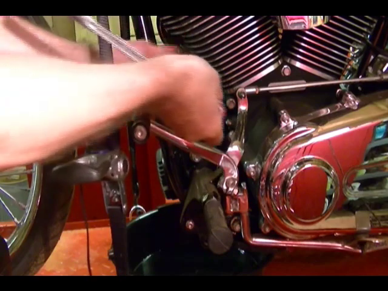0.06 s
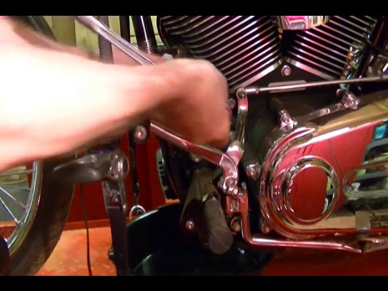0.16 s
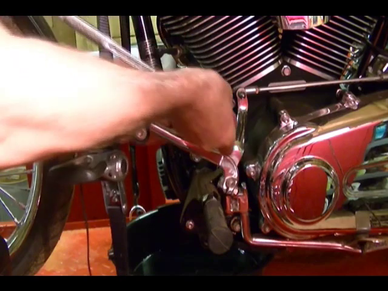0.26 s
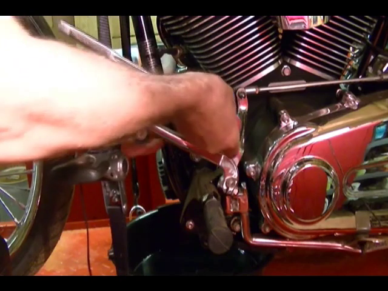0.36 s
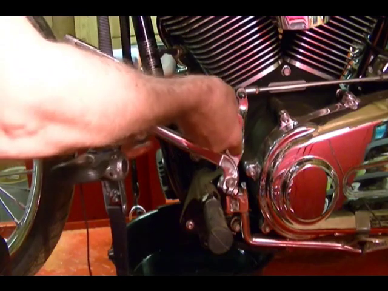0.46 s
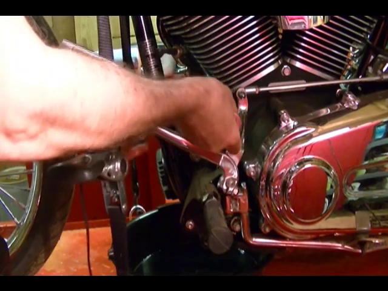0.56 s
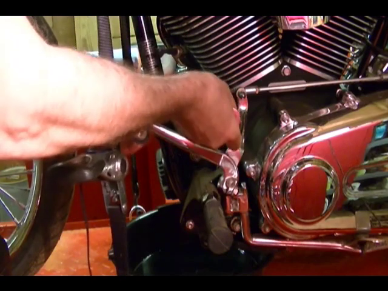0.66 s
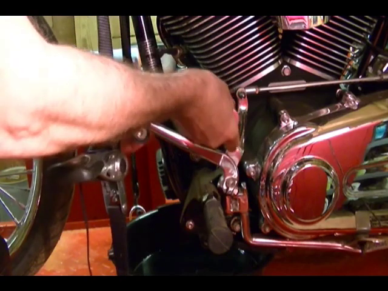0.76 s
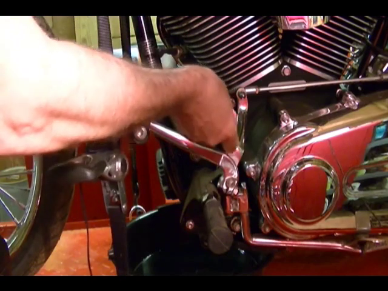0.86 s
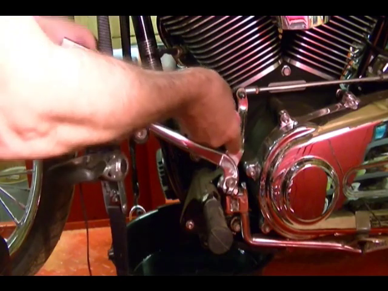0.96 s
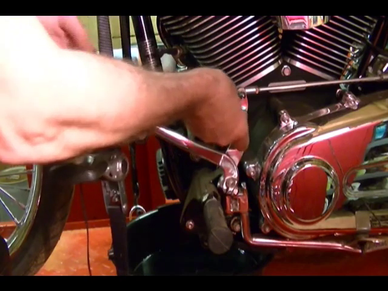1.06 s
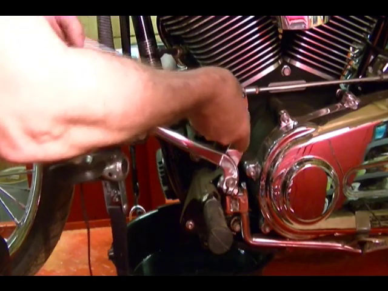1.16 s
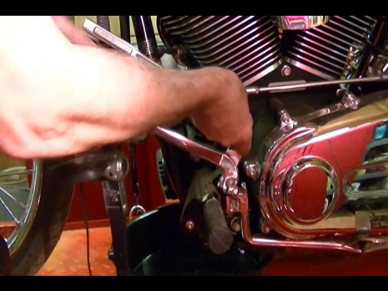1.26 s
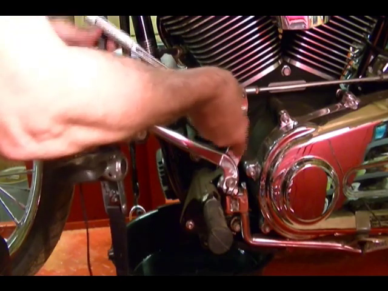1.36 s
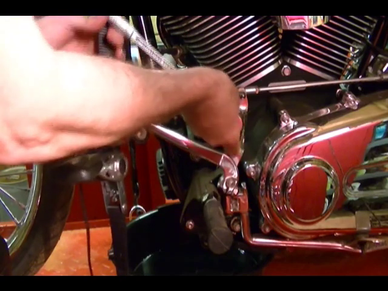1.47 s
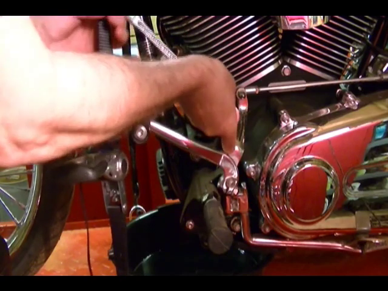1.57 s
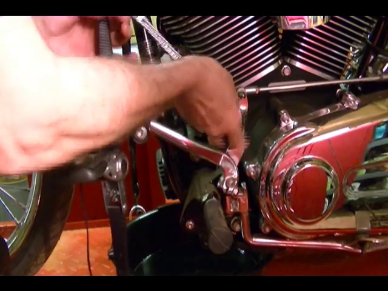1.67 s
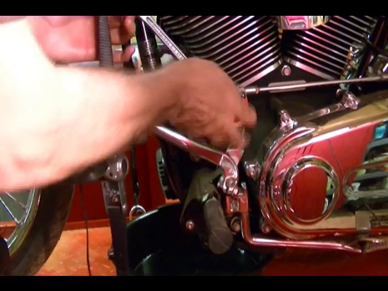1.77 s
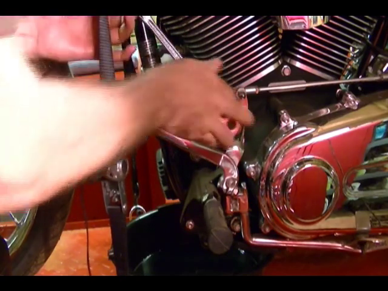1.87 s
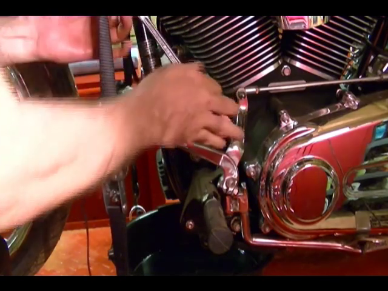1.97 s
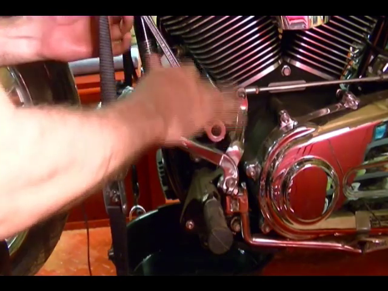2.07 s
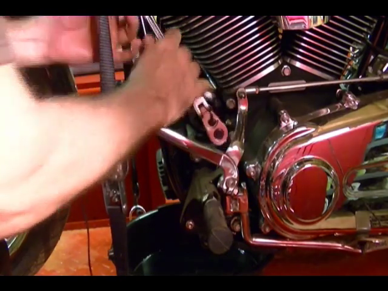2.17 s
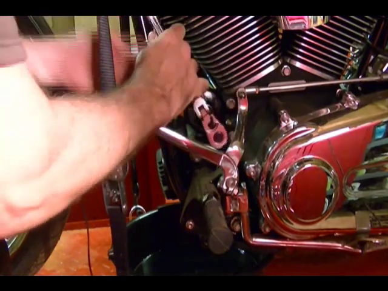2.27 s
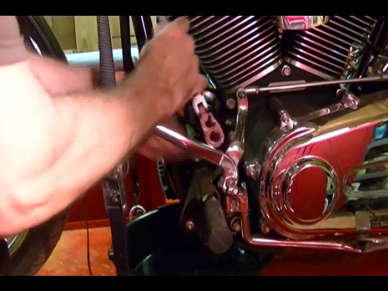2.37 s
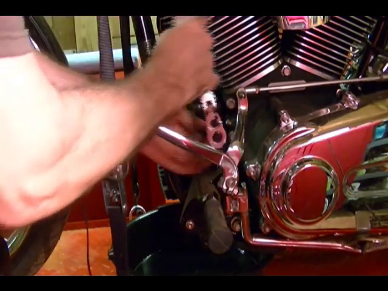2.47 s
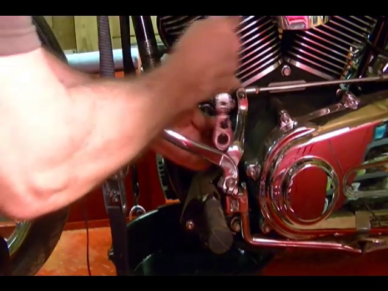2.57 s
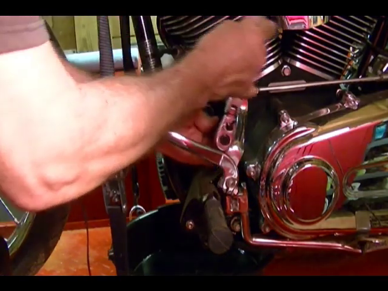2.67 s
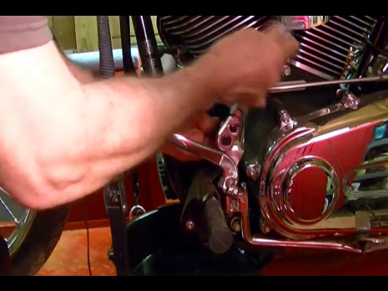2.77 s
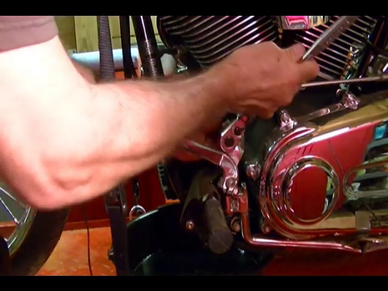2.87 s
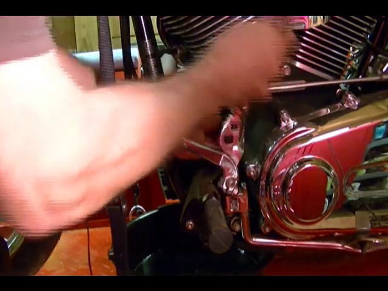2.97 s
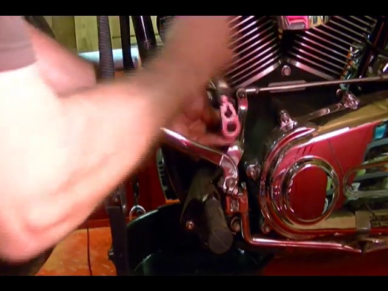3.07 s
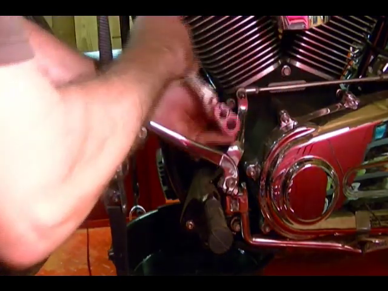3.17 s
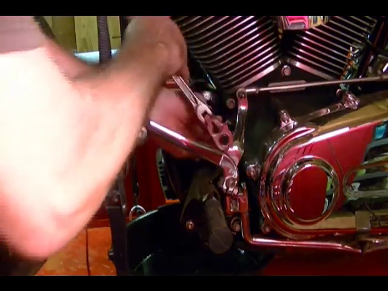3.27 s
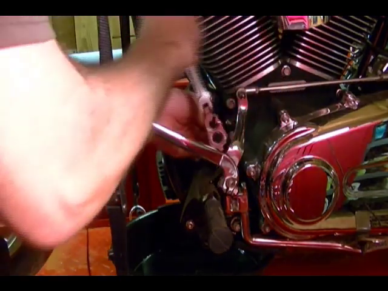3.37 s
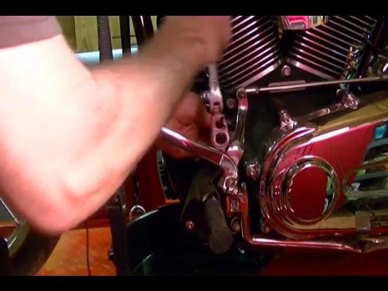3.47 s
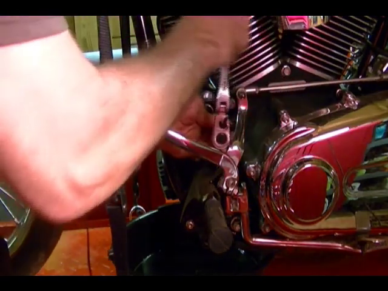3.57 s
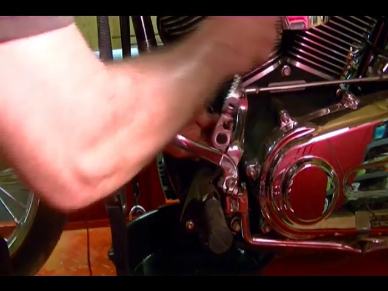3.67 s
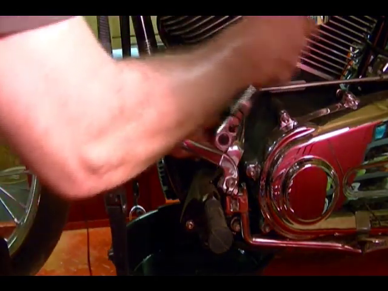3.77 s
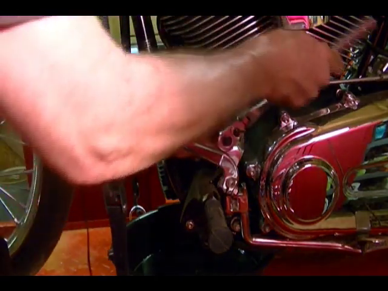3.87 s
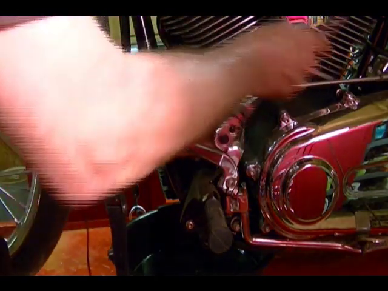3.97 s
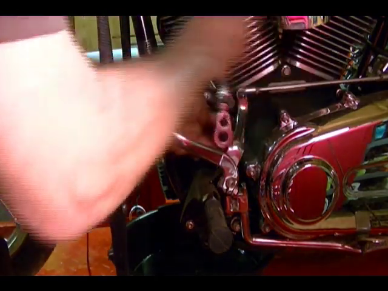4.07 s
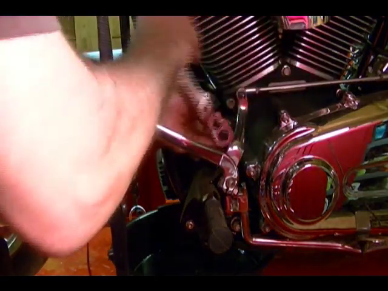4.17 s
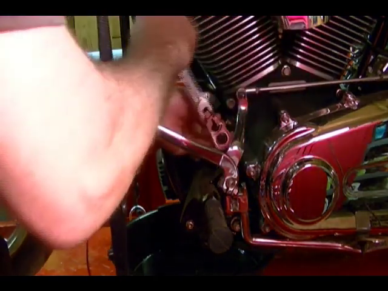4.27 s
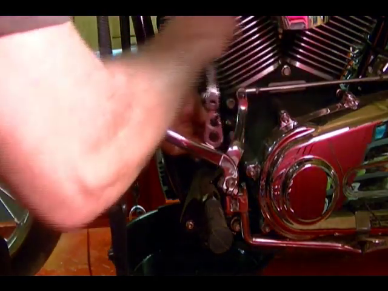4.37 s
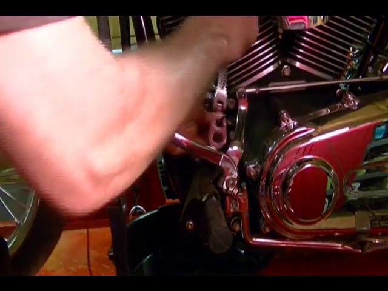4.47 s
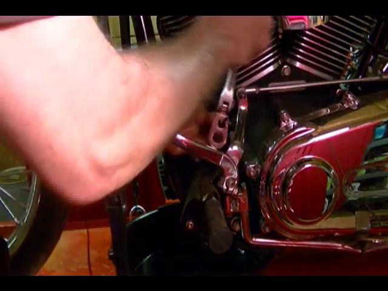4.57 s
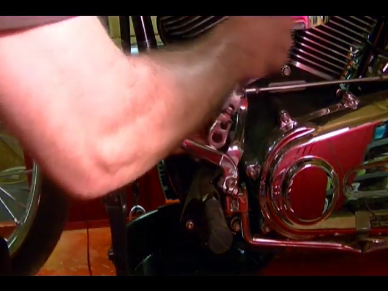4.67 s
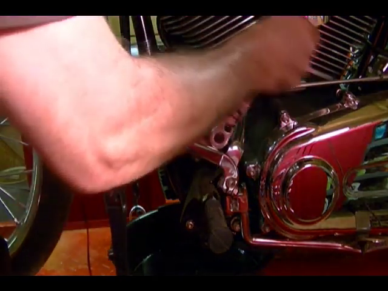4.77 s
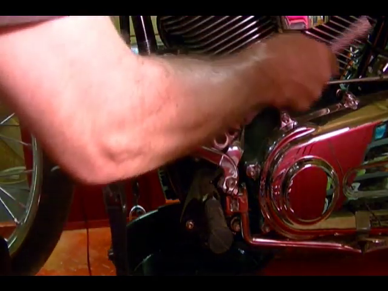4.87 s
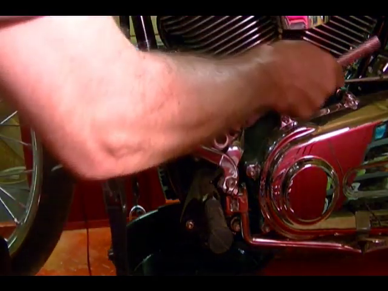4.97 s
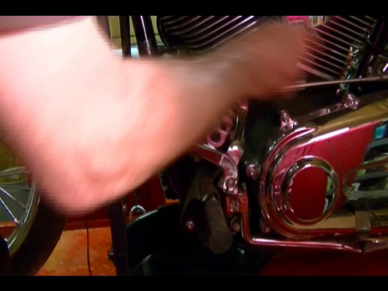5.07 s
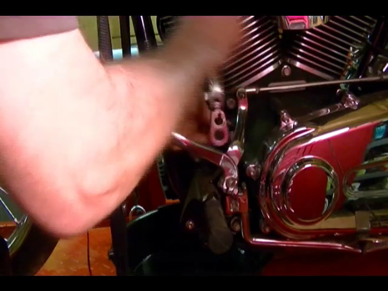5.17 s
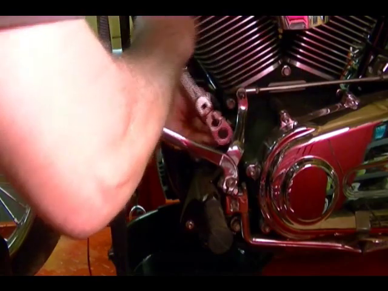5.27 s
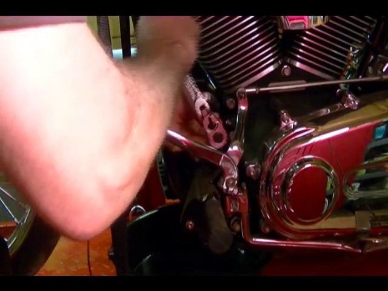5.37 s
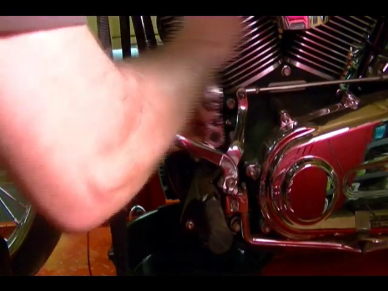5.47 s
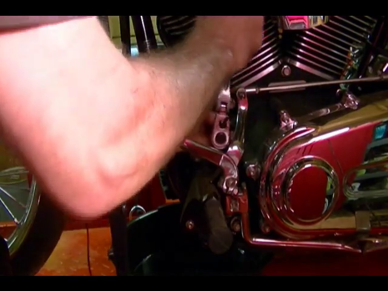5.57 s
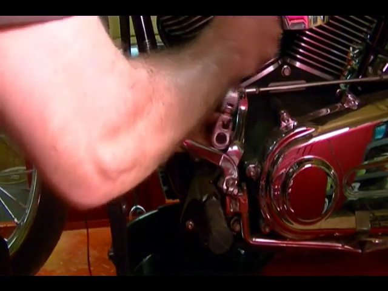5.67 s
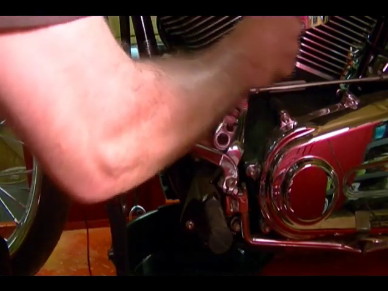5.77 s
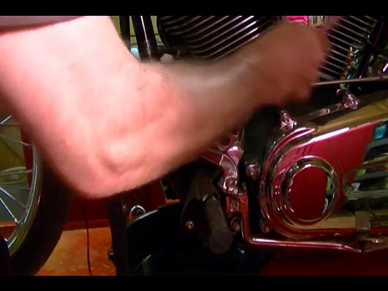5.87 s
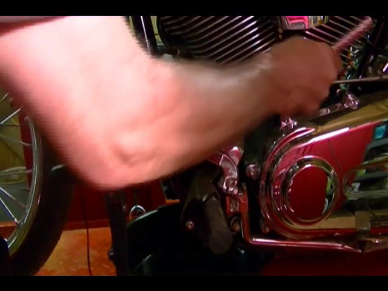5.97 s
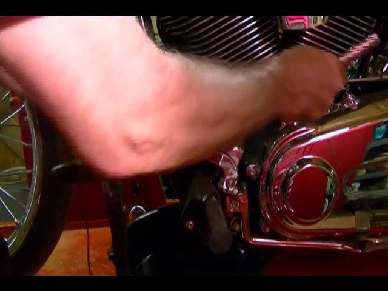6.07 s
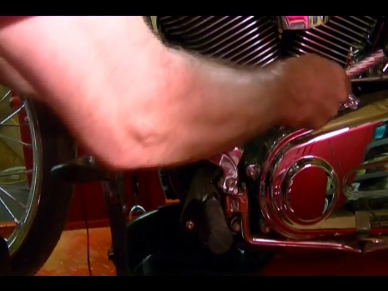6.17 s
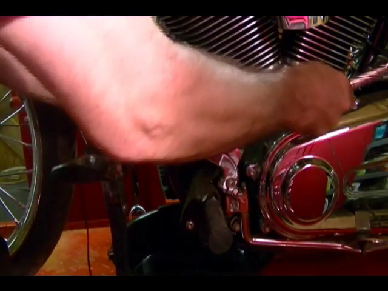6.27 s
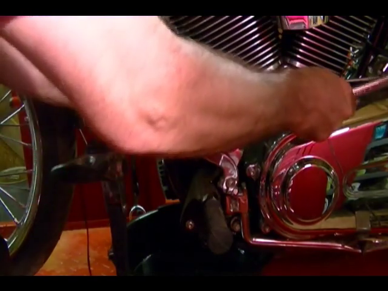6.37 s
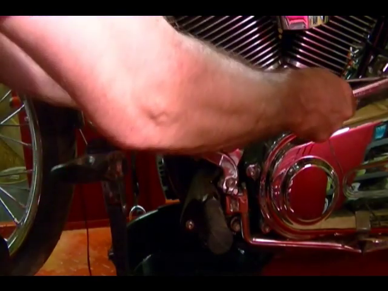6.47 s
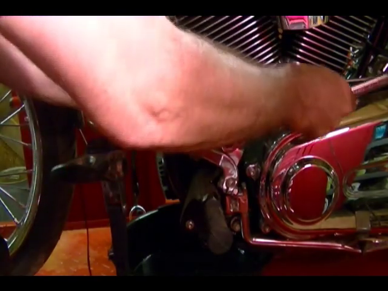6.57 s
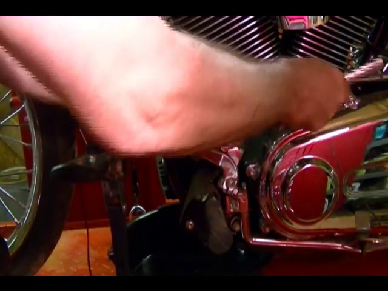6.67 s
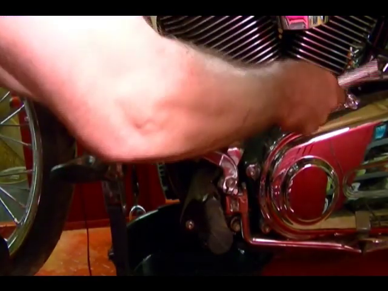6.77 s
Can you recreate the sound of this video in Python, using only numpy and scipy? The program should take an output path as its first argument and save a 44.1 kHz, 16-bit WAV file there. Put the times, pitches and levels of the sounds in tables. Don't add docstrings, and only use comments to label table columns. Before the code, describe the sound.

Close up in a small hard-walled garage, a steel bar clatters against an engine and rings brightly until a hand catches it. Dull knocks, skin rubs and small metal scuffs follow as the tool is seated. Then a ratchet clicks rapidly on three back swings, each followed by a sharp clank with a dull thump. Quiet shuffling ends it over steady hiss and faint hum.

```python
import sys
import numpy as np
from scipy import signal
from scipy.io import wavfile
from scipy.ndimage import uniform_filter1d

SR = 44100
rng = np.random.default_rng(int(sys.argv[2]) if len(sys.argv) > 2 else 0)


def gain_from_decibels(decibels):
    exponent = np.asarray(decibels, float) / 20
    return 10 ** exponent


def dump(signal):
    limited = np.clip(np.atleast_2d(signal).T, -1, 1)
    pcm = np.round(limited * 32767).astype(np.int16)
    wavfile.write(sys.argv[1], SR, pcm)


N = 300188

# (time [s], peak level [dB])
SLAMS = [
    (3.2389, -7),
    (4.2076, -7),
    (5.336, -8.5),
]
# (time [s], peak level [dB], strongest ring [Hz], treble level [dB], ring level [dB])
PAWL_CLICKS = [(3.047, -34, 5200, -22, -21), (3.07, -26.5, 4600, -9, -10), (3.096, -25, 4730, -4, -10),
               (3.1236, -23, 4870, 5, 3), (3.1533, -20.5, 5020, -2, 6), (3.178, -25.5, 5020, -3, -6),
               (4.0894, -19.5, 7200, 9, -9.5), (4.11, -22, 8000, 4, -7), (4.132, -23, 4600, -8, -12),
               (4.152, -24, 5200, 0.5, -14), (4.162, -24, 5260, 13, -10.5), (5.128, -37, 4600, -17, -7),
               (5.1429, -21, 4470, -9, -12), (5.1658, -23, 4600, 18, -7), (5.186, -23.5, 5500, 17, -8),
               (5.1967, -26, 5530, -2, -28), (5.207, -29.5, 5600, -9, -18)]
# (frequency [Hz], level [dB], t60 [s])
CAN_MODES = [(440, -31.5, 0.48), (712, -4, 0.056), (1060, 9, 0.016), (1210, 3, 0.054), (1680, 9.5, 0.021),
             (1830, 3.5, 0.045), (2135, 4, 0.033), (2730, -31, 0.055)]


def evened(x):
    return x / np.sqrt(np.mean(x ** 2) + 1e-20)


def read(points, hz):
    f, value = np.transpose(points)
    return np.interp(np.log(hz + 1), np.log(f + 1), value)


def add(mix, s, sound):
    part = mix[..., round(s * SR):][..., :sound.shape[-1]]
    part += sound[..., :part.shape[-1]]


def cut(x, hz, kind):
    return signal.sosfilt(signal.butter(2, hz, kind, fs=SR, output="sos"), x)


def band(x, lo_hz, hi_hz):
    return evened(cut(x, [lo_hz, hi_hz], "bandpass"))


def ring(modes, seconds, scatter_db=0., detune=0.):
    hz, db, t60 = np.transpose(modes)[:, :, None]
    chance = rng.standard_normal((2, len(modes), 1))
    t = np.arange(round(seconds * SR)) / SR
    phase = 2 * np.pi * hz * (1 + detune * chance[1]) * t
    decay_db = -60 * t / np.clip(t60, .001, 3)
    return (gain_from_decibels(db + scatter_db * chance[0] + decay_db) * np.cos(phase)).sum(0)


def strike(db, body, contact_ms, rise_ms, hz, ring_db, ring_ms):
    n, wall_blur_ms = 4000, 1.0
    ms = 1000 * np.arange(n) / SR
    chatter = rng.standard_normal(n) * gain_from_decibels(1.0 * rng.standard_normal(n))
    pressure = (1 - np.exp(-ms / max(rise_ms, .01))) * np.exp(-ms / max(contact_ms, .05))
    wash = signal.fftconvolve(chatter * pressure, body)[:n]
    swell = ms / max(ring_ms, .1)
    tone = swell * np.exp(1 - swell) * np.sin(2 * np.pi * hz * ms / 1000)
    blurred = np.pad(body, (0, n - len(body))) * np.exp(-ms / wall_blur_ms)
    spread = blurred * np.linalg.norm(wash) / np.linalg.norm(blurred)
    tone_db = ring_db + np.array([[0], [-15]])
    sound = np.array([wash, spread]) / abs(wash).max() + gain_from_decibels(tone_db) * tone
    return gain_from_decibels(db) * sound / abs(sound[0]).max()


def shiver(n, span):
    drift = uniform_filter1d(rng.standard_normal(n), size=span)
    return .75 + .5 * evened(uniform_filter1d(drift, size=span))


def swelling(db, length_s):
    return gain_from_decibels(db) * np.hanning(round(length_s * SR))


def steel(blows, modes, ring_ms):
    # (frequency [Hz], level [dB], t60 [s])
    treble_modes = [(8800, 18.5, 0.00066), (11200, 9.5, 0.0044), (12400, 1.5, 0.0033),
                    (13800, -36, 0.00144)]
    out = np.zeros((2, N))
    for s, db, hz, treble_db, contact_ms, ring_db in blows:
        body = ring(modes, .09, 0.17, 0.042)
        body = body + gain_from_decibels(treble_db + 15.0) * ring(treble_modes, .09, 2.5, .07)
        add(out, s, strike(db, body, contact_ms, 0.051, hz, ring_db, ring_ms))
    return cut(out, 1990, "highpass")


def ratchet():
    # (frequency [Hz], level [dB], t60 [s])
    head_modes = [(3650, 8.5, 0.012), (4470, 2.5, 0.028), (5020, 24.5, 0.014), (5900, 16.5, 0.013),
                  (7220, 9.5, 0.0072), (8200, 0.5, 0.014)]
    # (frequency [Hz], level [dB], t60 [s])
    drive_modes = [(2730, -31, 0.0011), (3350, 17.5, 0.0088), (3700, -16, 0.0037), (5200, -3, 0.0064),
                   (5500, -6.5, 0.011), (8060, 0, 0.0088)]
    # (time [s], peak level [dB], strongest ring [Hz], treble level [dB], contact [ms])
    clank_rows = [(0.3903, -18, 5900, -4, 4.1), (0.41, -16, 8060, -2, 5), (0.422, -20.5, 6200, 24, 17),
                  (0.431, -30, 7600, 3, 3.6), (0.4712, -10.5, 4940, -47, 3.6), (0.574, -12, 5020, -26, 11),
                  (0.582, -29, 3420, -34, 3.4), (0.804, -24, 3480, -45, 2.7), (1.3989, -19.5, 9730, 1, 5),
                  (2.2826, -23.5, 4650, -38, 5.8), (3.349, -29, 5330, -22, 2.7),
                  (4.1955, -31, 4700, -20, 7.5), (4.314, -33, 4300, -1, 3.9),
                  (5.5034, -31.5, 4500, -51, 1.9), (6.708, -36.5, 7720, 2, 4.6)]
    # (time [s], peak level [dB])
    play_rows = [
        (1.225, -49),
        (1.818, -44),
        (2.8903, -53),
        (2.9153, -50),
        (3.395, -44),
        (3.471, -38.5),
        (4.387, -40.5),
        (5.016, -51),
        (5.0495, -40),
    ]
    # time, peak dB, ring Hz, treble dB, contact ms, ring dB
    pawl = [(s, db, hz, treble_db, 3.45, ring_db) for s, db, hz, treble_db, ring_db in PAWL_CLICKS]
    clanks = [(*row, -10.5) for row in clank_rows]
    play = [(*row, 4600, -35, 4.5, -2.5) for row in play_rows]
    slams = [(s, db - 2, 4470, -12, 1.1, -5.5) for s, db in SLAMS]
    return steel(pawl + clanks + play, head_modes, 1.3) + steel(slams, drive_modes, 0.33)


def ticks():
    # (time [s], peak level [dB], centre [Hz], length [ms])
    contacts = [(0.082, -49, 3580, 1.7), (0.141, -56.5, 2200, 2.2), (0.371, -43, 3500, 1.3),
                (0.382, -43.5, 1590, 3), (0.3915, -13, 7400, 1.7), (0.4118, -24.5, 8500, 1.5),
                (0.4187, -16, 7050, 1.7), (0.4715, -1.5, 4370, 0.76), (0.4732, -15, 2030, 0.82),
                (0.514, -22, 1990, 3), (0.611, -17, 5500, 8.7), (0.8027, -18.5, 2350, 1.3),
                (1.384, -35, 1800, 1.5), (1.39, -35, 2930, 2.3), (1.4057, -26.5, 1480, 1.2),
                (2.2826, -17.5, 4230, 3.2), (2.284, -47, 1370, 3.7), (3.189, -22.5, 2480, 3.3),
                (3.24, -12, 4530, 0.5), (4.2076, -16, 4640, 0.29), (5.336, -18, 4540, 0.5),
                (5.504, -33, 4340, 1.5), (3.239, -20, 8900, 3.6), (4.2067, -28, 9100, 1.6),
                (5.336, -22, 8900, 1.5), (5.451, -32, 6000, 3)]
    # (level under the click [dB], centre [Hz], length [ms])
    tooth_scrape = [(-13, 2360, 2.15), (-4, 6700, 1.6)]
    scrapes = [(s, db + down_db, *rest) for s, db, *_ in PAWL_CLICKS for down_db, *rest in tooth_scrape]
    out, ms = np.zeros((2, N)), 1000 * np.arange(1500) / SR
    for s, db, hz, length_ms in contacts + scrapes:
        push = rng.standard_normal(1500) * np.exp(-ms / max(length_ms, .1))
        push[0] = 4
        burst = band(push, hz * 0.56, min(hz * 1.33, 18000))
        add(out, s, gain_from_decibels(db) * burst / abs(burst).max() * np.ones((2, 1)))
    return out


def pings():
    # (time [s], frequency [Hz], level [dB], t60 [s])
    lone_modes = [(.3908, 13000, -32, .05), (.3908, 8200, -23, .03), (.418, 13000, -38, .06),
                  (.422, 10800, -35, .05), (.8036, 1960, -21.5, 0.012), (.806, 3450, -35, 0.049),
                  (.806, 4060, -39.5, 0.082), (.808, 6770, -39, 0.06), (1.3995, 9530, -28.5, 0.023),
                  (1.3995, 7900, -34, 0.056), (1.4, 1675, -31, 0.058), (1.402, 9260, -43, 0.22),
                  (2.775, 3526, -45.5, .12), (4.09, 4870, -29, 0.019), (4.132, 4480, -31, 0.022),
                  (4.112, 1620, -34, 0.044), (5.207, 2930, -33, .03), (.4725, 13030, -34, .04),
                  (.575, 5242, -22, 0.097), (.575, 3200, -21.5, 0.061), (0.576, 3470, -21, 0.094),
                  (.582, 1832, -20, .06), (.576, 7800, -25, 0.11), (0.581, 6896, -24, .08),
                  (0.597, 3200, -30, 0.045), (.61, 3310, -26, 0.054), (1.77, 444, -47.5, 0.18),
                  (1.822, 625, -44.5, 0.08), (2.2826, 4790, -20.5, 0.019), (2.283, 8000, -33, 0.018),
                  (2.284, 1200, -40, 0.035), (2.283, 3119, -22.5, 0.017), (2.287, 4660, -30, 0.022),
                  (2.285, 2700, -33, 0.093), (2.287, 2210, -36, 0.13), (4.168, 9800, -41, .07),
                  (4.112, 6240, -39.5, 0.091), (5.34, 2750, -38, 0.21), (5.5025, 4630, -26, 0.01),
                  (5.5032, 3700, -30, .02), (5.506, 718, -31.5, 0.094), (5.508, 2380, -52.5, .5),
                  (5.508, 4285, -57, 0.33), (5.51, 424, -50, 0.3), (5.51, 483, -42.5, 0.32)]
    # (frequency [Hz], level under the slam [dB], t60 [s])
    crack_modes = [(3210, -5.5, 0.0097), (4480, -1, 0.018), (5450, -7.5, 0.0093), (5810, -13, 0.019),
                   (8000, -16.5, 0.0084), (11240, -16.5, 0.0071)]
    cracks = [(s, hz, db + down_db, t60) for s, db in SLAMS for hz, down_db, t60 in crack_modes]
    out, t, rise_cycles = np.zeros(N), np.arange(12000) / SR, 1
    for s, hz, db, t60 in lone_modes + cracks:
        rise = 1 - np.exp(-hz * t / rise_cycles)
        decay = gain_from_decibels(db - 60 * t / np.clip(t60, .002, .7))
        add(out, s, rise * decay * np.sin(2 * np.pi * hz * t))
    return out


def bar():
    # (frequency [Hz], level [dB], t60 [s])
    free_modes = [(1475, -17.5, .7), (2850.4, -14, .9), (2855.7, -14, .9), (4991, -1, .42), (7555, -16, .5),
                  (10461, -13, .26), (13030, -30, .22)]
    # (frequency [Hz], level [dB], t60 [s])
    held_modes = [(1680, -1, .12), (2853, -8, .6), (3413, -3, .2), (5001, -8, .25), (6094, -8, .25),
                  (6896, -6, .4), (7913, -5, .16), (9329, -7, .15), (10476, -4, .2), (10561, 2, .26),
                  (10534, -5, .38), (13040, -20, .22), (15080, -21, .25)]
    struck_s, caught_s = 0.4722, .575
    free_db, left_db, held_db = -11, -16, -27
    out = np.zeros(N)
    free = ring(free_modes, .6)
    t = struck_s + np.arange(len(free)) / SR
    caught = np.clip((t - caught_s) / 0.0069, 0, 1)
    rise = np.clip((t - struck_s) / 0.025 + .3, 0, 1)
    level_db = free_db + left_db * caught - 60 * caught * (t - caught_s) / .5
    add(out, struck_s, gain_from_decibels(level_db) * rise * free)
    add(out, caught_s, gain_from_decibels(held_db) * ring(held_modes, 0.19))
    return out


def knocks():
    # (time [s], peak level [dB], strongest ring [Hz], ring level [dB])
    case_knocks = [(0.141, -45.5, 630, 6), (0.894, -37, 624, 3), (0.922, -38.5, 627, 6),
                   (0.947, -39, 604, 16), (1.078, -37, 618, 13), (1.189, -43.5, 600, 11),
                   (1.276, -47, 577, 16), (1.324, -46, 597, 18), (1.824, -37.5, 440, 11),
                   (2.424, -38.5, 708, -8), (2.841, -43.5, 674, 5), (2.896, -44, 670, 9),
                   (2.915, -40.5, 685, -5), (3.246, -22, 702, -5), (3.395, -34.5, 730, -6),
                   (3.473, -33, 708, -7), (5.023, -39.5, 706, -5), (5.336, -23.5, 692, -6.5),
                   (5.53, -37, 474, -4), (6.706, -42.5, 655, 1)]
    # (time [s], peak level [dB], strongest ring [Hz], ring level [dB])
    wall_knocks = [(0.018, -39, 1290, 9), (0.081, -30.5, 1270, -4.5), (0.317, -40.5, 1210, -3.5),
                   (0.643, -18.5, 1210, 3.5), (0.66, -22, 1160, 24), (0.708, -28.5, 1160, -9),
                   (0.783, -20, 1100, -7), (0.8033, -17, 1210, -0.5), (1.382, -24.5, 1120, -4),
                   (1.392, -21, 1160, 5), (1.4, -21, 1100, 16), (1.404, -24.5, 1230, 15),
                   (2.564, -45.5, 1050, -3), (2.994, -38.5, 1210, -2), (3.013, -38.5, 1290, -9),
                   (3.18, -25, 1160, -2), (3.927, -36.5, 1050, 5), (3.97, -44, 1160, 1),
                   (4.031, -28, 1103, 7.5), (4.165, -26.5, 1070, -4), (4.196, -27, 1070, -17),
                   (4.207, -22, 1340, -6), (4.373, -30, 1180, -5), (4.387, -28, 1250, -3.5),
                   (5.049, -32.5, 1190, -8), (5.105, -30, 1130, 9), (5.121, -21.5, 1130, 4.5),
                   (5.447, -28, 1210, -5), (5.468, -33, 1080, 4), (6.655, -44.5, 1020, 6)]
    # (time [s], peak level [dB], strongest ring [Hz], ring level [dB])
    end_knocks = [(0.042, -40.5, 1960, -2.5), (0.372, -34.5, 1830, -4), (0.3905, -14.5, 1800, 2),
                  (0.41, -13.5, 1770, 13), (0.417, -13.5, 1730, 10), (0.427, -13.5, 1700, 4.5),
                  (0.445, -23, 1550, 15.5), (0.469, -7.5, 1800, 6), (0.574, -14.5, 1680, 32),
                  (0.611, -15.5, 2430, 2.5), (1.077, -38, 1830, 10), (1.768, -33, 1740, -19),
                  (2.2832, -16.5, 2410, -1), (3.036, -35.5, 1830, -13), (3.193, -18.5, 1890, -3),
                  (3.238, -22, 2160, -5), (4.173, -15, 1803, 2), (5.207, -23, 1910, 1),
                  (5.239, -31, 1750, 0), (5.44, -27, 1610, -15), (5.504, -20, 2245, -2),
                  (6.698, -39.5, 2380, -10)]
    teeth = [(s, db - 11.5, 1800, -1) for s, db, *_ in PAWL_CLICKS]
    kinds = [(case_knocks, 13), (wall_knocks, 5.44), (end_knocks, 4.86), (teeth, 4.7)]
    out = np.zeros((2, N))
    for blows, contact_ms in kinds:
        for s, db, hz, ring_db in blows:
            body = ring(CAN_MODES, .09, 4.0, 0.013)
            add(out, s, strike(db, body, contact_ms, 0.14 * contact_ms, hz, ring_db, 0.27 * contact_ms))
    return cut(cut(out, 536, "highpass"), 3100, "lowpass")


def socket():
    # (time [s], peak level [dB])
    taps = [
        (2.774, -25.5),
        (3.8272, -37),
    ]
    # (frequency [Hz], level [dB], t60 [s])
    socket_modes = [(2277, -2, .045), (3690, -8, .045), (3800, -14, .11), (4900, -5, .004),
                    (6675, -22, .05), (7311, -13, .08), (7881, -11, .05), (13300, -12, .015)]
    out = np.zeros((2, N))
    for s, db in taps:
        add(out, s, strike(db, ring(socket_modes, .09), 0.71, 0.013, 2217, -5.5, 3.7))
    return cut(out, 2000, "highpass")


def handle_and_panels():
    # (frequency [Hz], level [dB], t60 [s])
    handle_modes = [(3390, -43, .3), (4335, -44, .3), (4480, -43, .5), (4900, -45, .25), (2230, -41, .25),
                    (7520, -48, .3)]
    # (time [s], frequency [Hz], level [dB], t60 [s])
    panel_modes = [(0.392, 6010, -31, 0.38), (.391, 7020, -28, 0.19), (.391, 8300, -32, .12),
                   (.391, 750, -31, 0.18), (.578, 5200, -36, 0.59), (.578, 3380, -36, 0.51),
                   (2.284, 1212, -34, 0.072), (2.289, 482, -36.5, 0.17), (0.805, 5960, -45, 0.3),
                   (1.4, 1059, -39.5, 0.53), (1.4, 4760, -27.5, 0.055), (1.4, 6030, -31.5, 0.074),
                   (1.4, 9650, -45, 0.22), (2.285, 4400, -40, 0.22), (2.285, 2390, -38, 0.36),
                   (2.285, 1700, -45, .25), (3.479, 1723, -53, 0.5), (5.508, 1750, -45.5, 0.53)]
    out = np.zeros(N)
    for s, db in SLAMS:
        tail = gain_from_decibels(3) * ring(handle_modes, .4, 1.5, .004)
        add(out, s, gain_from_decibels(db) * tail * shiver(len(tail), span=150))
    for s, *mode in panel_modes:
        tail = ring([mode], .35)
        add(out, s, tail * shiver(len(tail), span=80))
    return out


def thumps():
    # (time [s], peak level [dB], push [ms])
    landings = [
        (0.381, -60, 6),
        (0.469, -48, 4),
        (1.391, -39, 1.8),
        (2.282, -41.5, 1.4),
        (3.012, -56, 3.3),
        (3.238, -33.5, 1.4),
        (4.208, -36, 1.2),
        (5.517, -41, 2.3),
    ]
    out, t = np.zeros(N), np.arange(6000) / SR
    for s, db, push_ms in landings:
        u = 1000 * t / max(push_ms, .3)
        push = 0.5 * u * (2 - u) * np.exp(-u)
        rumble = band(rng.standard_normal(6000), 323, 910) * gain_from_decibels(-60 * t / 0.27)
        add(out, s, gain_from_decibels(db) * (push + 0.79 * rumble))
    return out


def scuffs():
    # (middle [s], level [dB], length [ms])
    skids = [
        (.9, -50, 77),
        (0.951, -49.5, 31),
        (1.081, -46, 48),
        (1.188, -49.5, 23.5),
        (1.509, -53.5, 76),
        (1.776, -48, 69),
        (2.44, -62.5, 21),
        (5.454, -50, 44),
    ]
    out = np.zeros(N)
    for s, db, ms in skids:
        n = round(ms * SR / 1000)
        grit = band(rng.standard_normal(4000) * gain_from_decibels(0.79 * rng.standard_normal(4000)), 980, 7500)
        add(out, s - ms / 2000, gain_from_decibels(db) * grit[:n] * np.hanning(n)[:4000])
    return out


def wisps():
    # (middle [s], level [dB], length [s], centre [Hz])
    brushes = [
        (2.13, -71.5, .12, 12000),
        (5.469, -56, .012, 10000),
        (3.183, -44, .01, 12500),
        (5.21, -42, .012, 5000),
        (.568, -56, .02, 10000),
        (.64, -44, .18, 4400),
        (3.256, -36, .012, 4500),
        (3.27, -46, .08, 9000),
        (.812, -40, .03, 5000),
        (.142, -50, .008, 2500),
    ]
    out = np.zeros(N)
    for s, db, length, hz in brushes:
        hiss = band(rng.standard_normal(9000), hz * .7, hz * 1.1)
        swell = swelling(db, length)
        add(out, s - length / 2, hiss[:len(swell)] * swell)
    return out


def hands():
    # (time [s], effort [dB])
    effort_points = [(0.0, 8), (0.3, -4), (0.55, -8), (0.87, 11.5), (1.3, 5), (2.03, -3), (2.54, -4),
                     (2.9, -2), (3.27, 5), (3.5, 12), (3.66, -7), (4.3, 19), (4.49, -4), (5.08, -3.5),
                     (5.5, 14), (5.7, -5.5), (6.6, -5.5), (6.8, 7.5)]
    # (middle [s], level [dB], length [s])
    rub_strokes = [
        (0.6, -44, 0.52),
        (1.038, -60.5, 0.68),
        (3.199, -47, 0.11),
        (3.357, -56, 0.18),
        (4.29, -57, 0.27),
        (5.2, -63, 0.15),
        (5.447, -64, 0.24),
    ]
    # (middle [s], level [dB], length [s])
    grinds = [
        (0.425, -30, 0.11),
        (0.667, -67, 0.079),
        (5.436, -45, 0.22),
    ]
    effort_db = np.interp(np.arange(N) / SR, *np.transpose(effort_points))
    thud = band(rng.standard_normal(N), 54.0, 397)
    slips = rng.standard_normal(N) * (rng.random(N) < 500 / SR)
    rattle = band(signal.oaconvolve(slips, ring(CAN_MODES, .1))[:N], 280, 2170)
    rattle = rattle + 1.15 * band(rng.standard_normal(N), 475, 1560)
    grain = gain_from_decibels(0.96 * evened(uniform_filter1d(rng.standard_normal(N), 150)))
    rub = band(grain * rng.standard_normal(N), 1670, 7600)
    strokes = np.full(N, gain_from_decibels(-67.5))
    for s, db, length in rub_strokes:
        add(strokes, s - length / 2, swelling(db, length))
    shake = gain_from_decibels(-65 + 0.84 * effort_db)
    for s, db, length in grinds:
        add(shake, s - length / 2, swelling(db, length))
    return gain_from_decibels(-60 + 0.22 * effort_db) * thud + shake * evened(rattle) + strokes * rub


def frame():
    # (from [s], to [s], level [dB])
    leans = [
        (0.899, 1.064, -49),
        (1.798, 1.963, -50.5),
        (3.195, 3.252, -41),
    ]
    tube_hz = 233.4
    out = np.zeros(N)
    for start, end, db in leans:
        n = round((end - start) * SR)
        grip = gain_from_decibels(1.1 * evened(uniform_filter1d(rng.standard_normal(16000), size=500))[:n])
        tone = np.sin(2 * np.pi * tube_hz * np.arange(n) / SR)
        rub = 0.52 * band(rng.standard_normal(16000), 63, 590)[:n]
        add(out, start, gain_from_decibels(db) * grip * (tone + rub) * signal.windows.tukey(n, .6))
    return out


def rocking():
    # (middle [s], level [dB], length [s], centre [Hz])
    rocks = [
        (1.429, -52, 0.096, 220),
        (2.333, -56, 0.076, 400),
        (1.05, -69, .4, 136),
        (1.863, -57, 0.19, 99),
        (3.02, -55, 0.053, 70),
        (3.21, -49, .06, 120),
        (4.095, -63.5, .62, 80),
        (4.903, -66, .5, 79),
        (5.597, -55, 0.19, 275),
    ]
    out = np.zeros(N)
    for s, db, length, hz in rocks:
        swell = swelling(db, length)
        rumble = band(rng.standard_normal(30000), hz * 0.8, hz * 1.25)[2000:]
        add(out, s - length / 2, rumble[:len(swell)] * swell)
    return out


def deep_boom():
    out, push_ms = np.zeros(N), 5
    u = 1000 * np.arange(4000) / SR / push_ms
    add(out, .47, gain_from_decibels(-30) * u * np.exp(1 - u))
    return out


def sliding_whistle():
    out = np.zeros(N)
    end_s, length_s, hz, width_hz, db = .385, .16, 6000, 500, -63
    n = round(length_s * SR)
    squeak = band(rng.standard_normal(12000), hz - width_hz / 2, hz + width_hz / 2)[:n]
    add(out, end_s - length_s, gain_from_decibels(db) * squeak * np.linspace(0, 1, n))
    return out


def garage(x):
    # (frequency [Hz], t60 [s])
    room_t60 = [(200, 0.97), (1000, 0.5), (4000, 0.4), (12000, 0.24)]
    out, t = np.zeros(N), np.arange(N) / SR
    for k in range(3):
        echoes = np.zeros(SR // 2)
        at = np.arange(160, SR // 2 - 20, 20)
        echoes[at + rng.integers(0, 20, len(at))] = rng.choice([-1., 1.], len(at))
        hz, lag, z = signal.stft(echoes, SR, nperseg=256)
        tail = signal.istft(z * gain_from_decibels(-60 * lag / read(room_t60, hz)[:, None]), SR, nperseg=256)[1]
        turn = np.sqrt(2 / 3) * np.cos(2 * np.pi * (7 * t + k / 3))
        out += signal.fftconvolve(x * turn, tail / np.linalg.norm(tail))[:N]
    return out


def air():
    # (frequency [Hz], level per Hz [dB])
    hiss_colour = [(15, -45), (25, -31), (76, -28.5), (245, -30), (273, -40.5), (483, 9.5), (669, 12),
                   (854, 8.5), (1980, 2), (5130, 1), (13300, -7.5), (15200, -11.5), (16500, -11)]
    # (frequency [Hz], level [dB])
    hum_tones = [(80.7, -114), (479.1, -70.5), (839.8, -72.5), (1082, -74), (1200, -79), (1319, -77),
                 (1561, -74.5), (1680, -109)]
    frames, hz = N // 256 + 5, np.fft.rfftfreq(1024, 1 / SR)
    a, b, patches = rng.standard_normal((frames, 513, 3)).T
    patches = evened(uniform_filter1d(uniform_filter1d(patches, 12, 0), 14, 1))
    z = (a + 1j * b) * gain_from_decibels(read(hiss_colour, hz)[:, None] + 1.0 * patches)
    hiss = evened(signal.istft(z, nperseg=1024, noverlap=768)[1][:N])
    t, hum = np.arange(N) / SR, np.zeros(N)
    for f, db in hum_tones:
        hum += gain_from_decibels(db) * np.sqrt(2) * np.sin(2 * np.pi * (f * t + rng.random()))
    return gain_from_decibels(-62.5) * hiss + hum


def scene():
    pings_to_walls_db, walls_db = -5.5, -7.0
    bright = ratchet() + socket() + scuffs() + ticks()
    bright = bright + pings() * gain_from_decibels(np.array([[0], [pings_to_walls_db]]))
    dull = knocks() + thumps()
    near = bright[0] + dull[0] + bar() + handle_and_panels() + hands() + frame()
    near = near + rocking() + deep_boom() + sliding_whistle()
    heard = near + garage(gain_from_decibels(walls_db) * (bright[1] + dull[1]))
    return (cut(heard, 15000, "lowpass") + air() + wisps())[None]


def low_pass(x):
    return signal.sosfilt(signal.butter(12, 16820, fs=SR, output="sos"), x)


def record(dry):
    heard = cut(dry, 78, "highpass")
    power_db = 10 * np.log10(abs(uniform_filter1d(heard[0] ** 2, 400)) + 1e-12)
    fall_db = np.arange(N) * 20.3 / SR
    held_db = np.maximum.accumulate(power_db + fall_db) - fall_db
    over_db = np.maximum(held_db + 26.5, 0)
    late_db = np.concatenate([np.zeros(600), uniform_filter1d(over_db, 400)[:-600]])
    x = heard / gain_from_decibels(0.7 * late_db)
    limited = 0.57 * np.tanh(x / 0.5) + 0.061 * x ** 2
    treble_edge = signal.ellip(8, .3, 38, 15900, fs=SR, output="sos")
    return low_pass(signal.sosfilt(treble_edge, limited))


dry = scene()
out = record(dry)
dump(out)
```